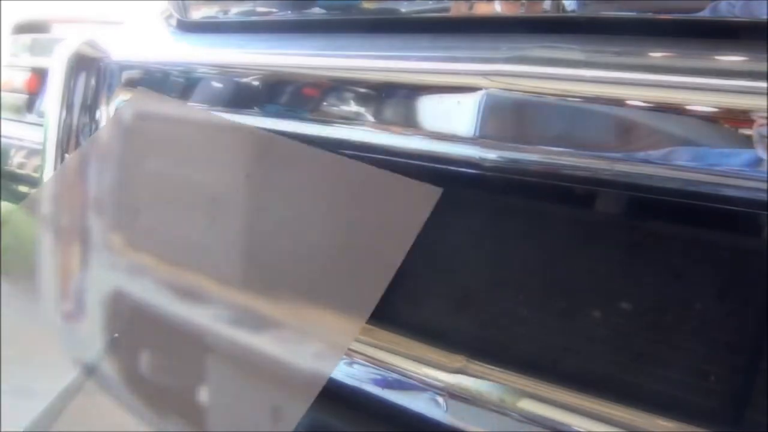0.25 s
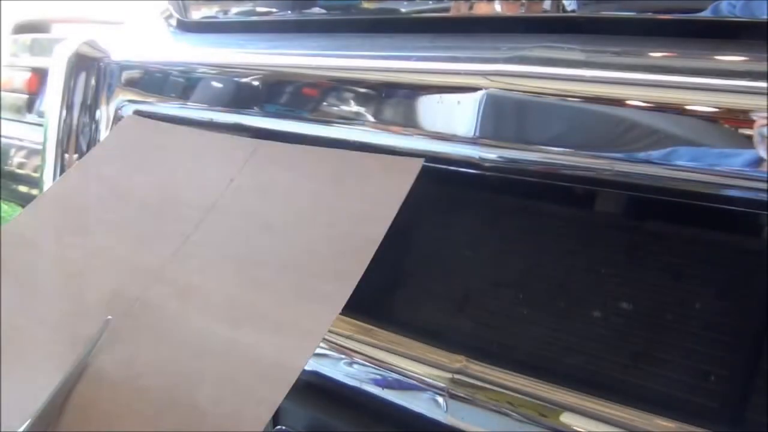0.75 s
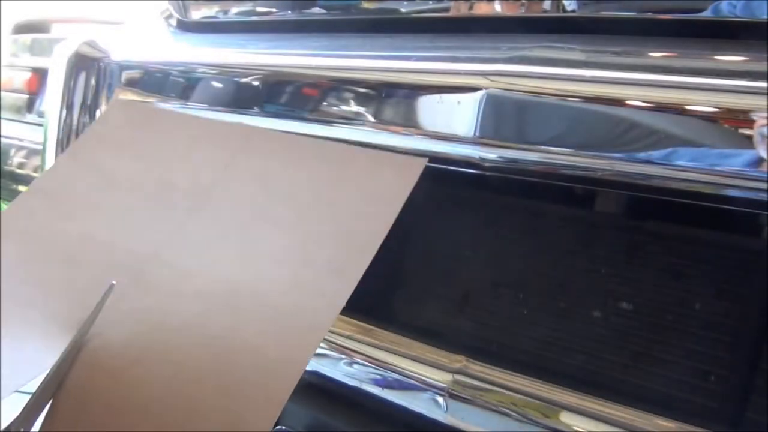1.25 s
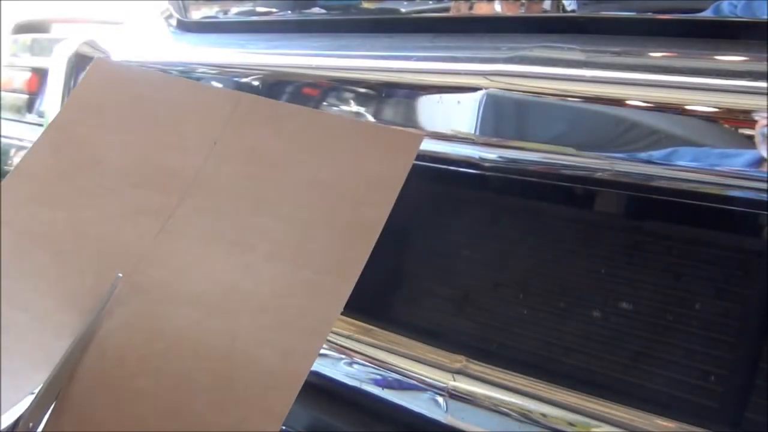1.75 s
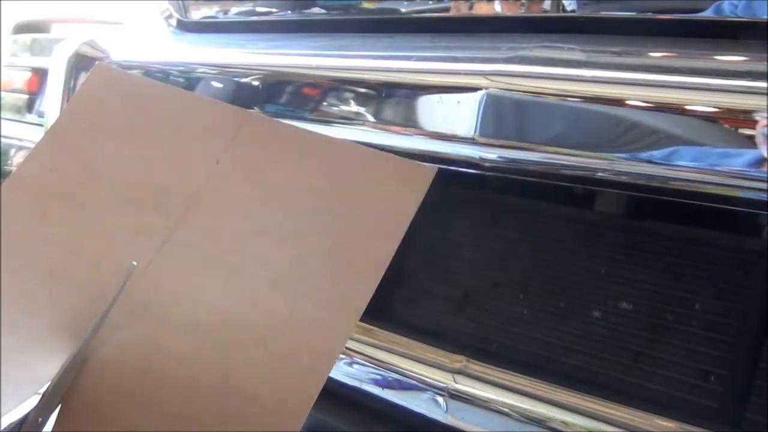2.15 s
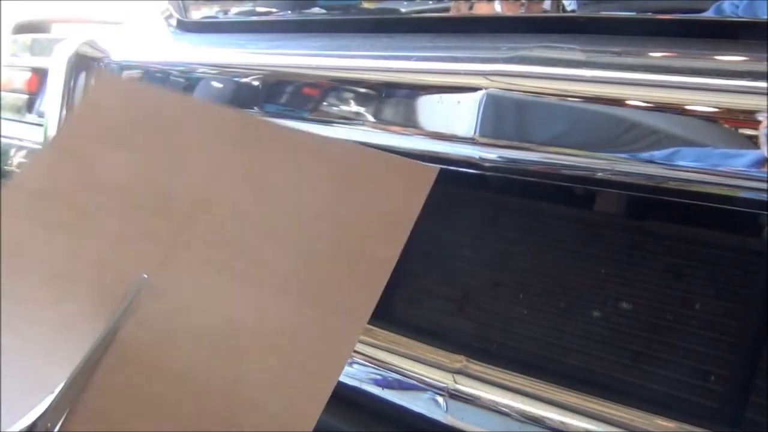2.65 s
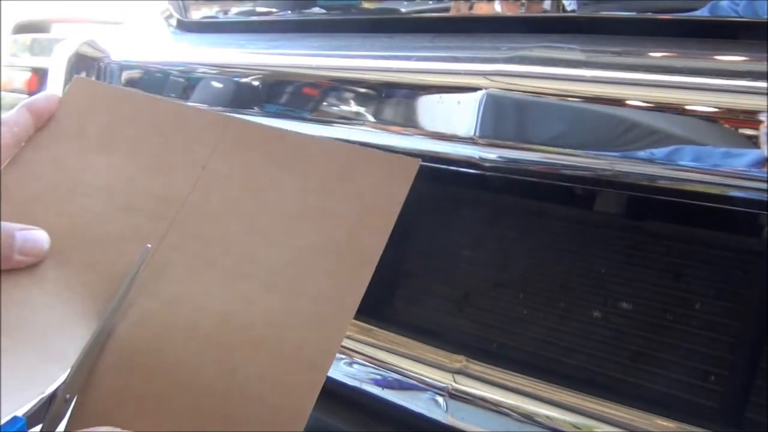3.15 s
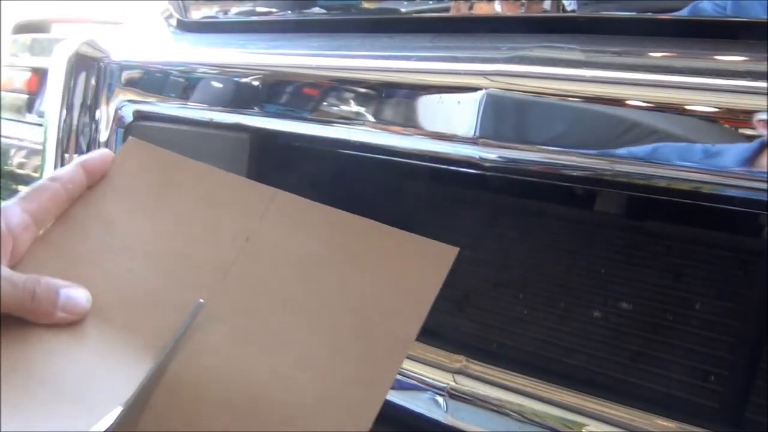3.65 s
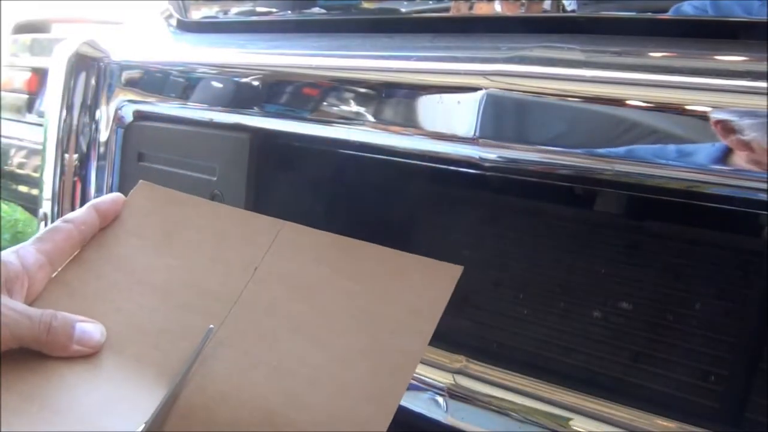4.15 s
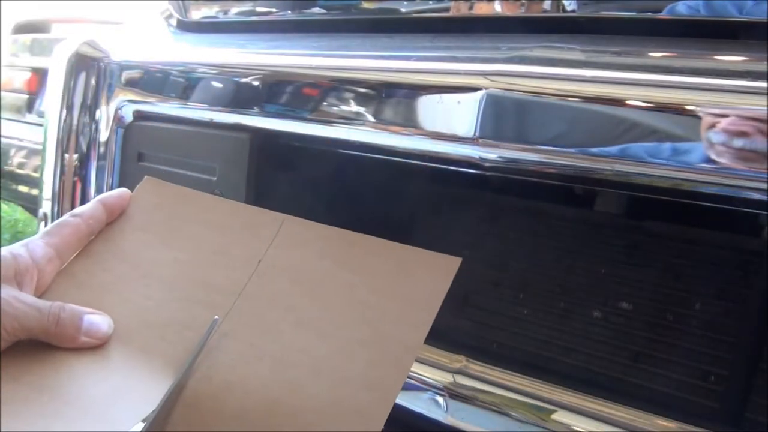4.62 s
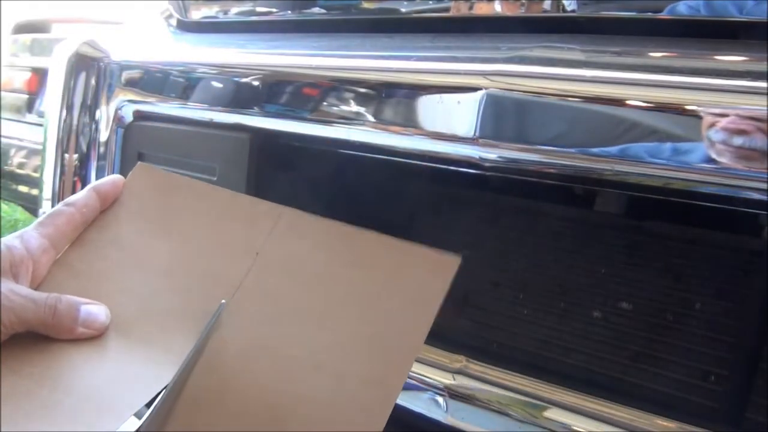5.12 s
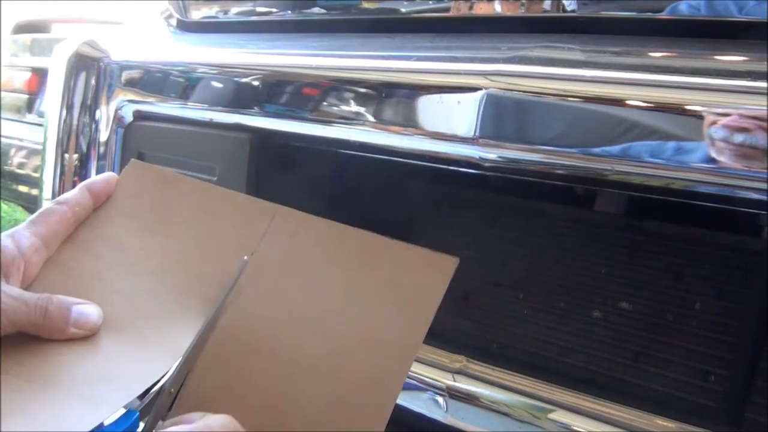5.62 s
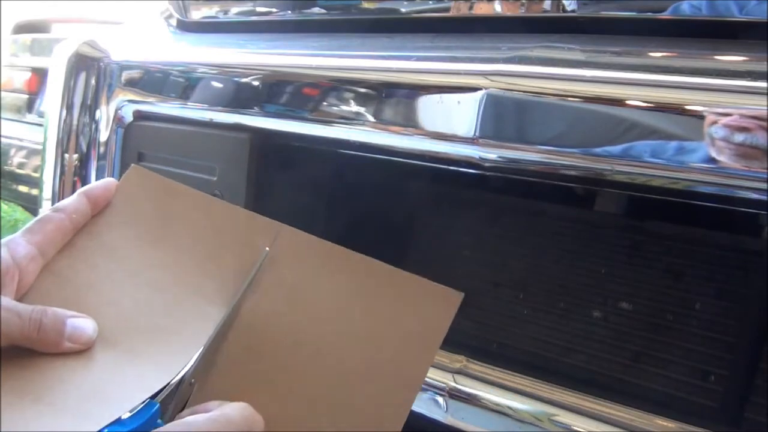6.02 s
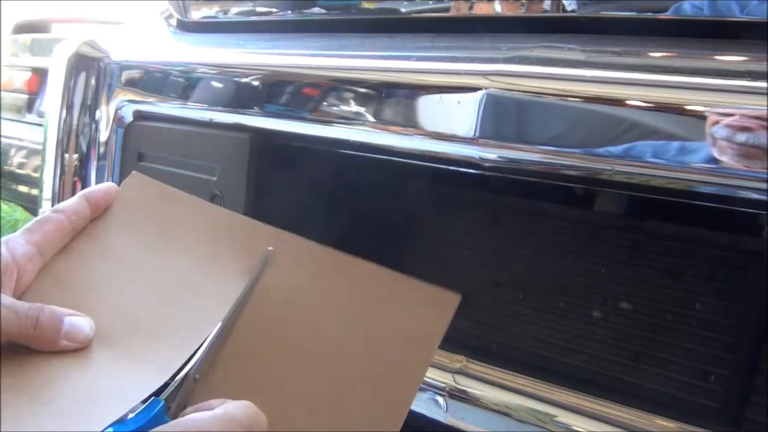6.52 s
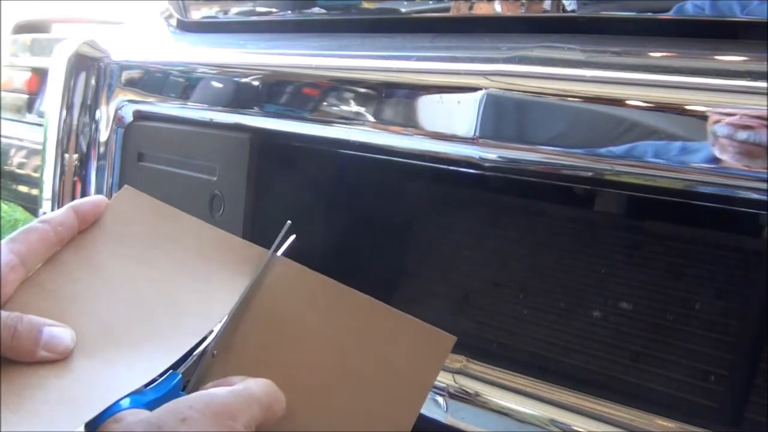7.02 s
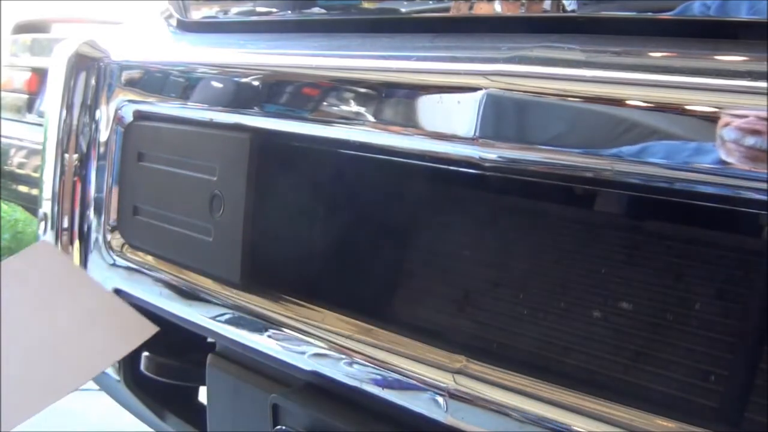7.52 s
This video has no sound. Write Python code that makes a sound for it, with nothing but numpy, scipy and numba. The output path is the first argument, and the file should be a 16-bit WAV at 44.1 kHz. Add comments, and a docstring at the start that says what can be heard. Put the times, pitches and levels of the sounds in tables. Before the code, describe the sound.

A close camcorder perspective in a garage, with short reflections and a steady low outdoor rumble and hiss. The tail of a cut and small sheet knocks open the scene. A slow, crackling scissor stroke through thin cardboard comes at 0.7 seconds, then a sharp papery pop at 1.15. More gritty cuts follow at 1.6, 2.2, 2.6 and a stronger one at 3.2, separated by soft blade rubs, dull knocks and brief sagging flexes of the sheet. Around 4.2 a thin, wavering high motor whine swells and fades during a pause. Cutting resumes at 4.9 with quicker, crisper strokes at 5.4, 5.8, 6.4, 6.7 and 7.1, blades rubbing open between them. A faint clink at 7.2 precedes a hard, bright steel strike at 7.5, bouncing and skidding for about 0.2 seconds. The background briefly drops, and a snappy card knock ends it near 7.77.

```python
"""Scissors cutting thin cardboard in a garage

Scissors cut a sheet of thin cardboard close to a camcorder, slowly at first, then in quick strokes.
Each stroke is a run of fibre fractures: grainy noise bursts colored by resonances of sheet and blades.
Between strokes the blades rub back open as softer filtered friction; the sheet knocks in short bursts
and flexes in damped, sagging sines. The zoom motor whines faintly over air noise, and at the end steel
strikes something hard and skids: decaying sines and clicks, then a bank of high modes over chatter."""
import sys
import numpy as np
from scipy import signal
from scipy.fft import rfft, irfft
from scipy.io import wavfile
from numba import njit

SR = 44100
rng = np.random.default_rng(int(sys.argv[2]) if len(sys.argv) > 2 else 0)


def output_pcm(signal):
    """Save a mono or channel-first signal as 16-bit PCM at the path in sys.argv[1].

    Samples are clipped to [-1, 1] before scaling.
    """
    pcm = np.clip(np.atleast_2d(signal).T, -1, 1) * 32767
    wavfile.write(sys.argv[1], SR, np.round(pcm).astype(np.int16))


N = 342910
TIME = np.arange(N) / SR
FREQ = np.maximum(np.fft.rfftfreq(2 * N, 1 / SR), 1)


def undb(db):
    """Logarithmic level: decibels to amplitude gain."""
    return 10 ** (np.asarray(db) / 20)


def noise():
    """White noise: equal power at all frequencies, rms near 1."""
    return rng.standard_normal(N)


def unit(x):
    """Normalization of power: scale to rms 1."""
    return x / np.sqrt(np.mean(x ** 2))


def walk(rate):
    """Random modulation: straight lines between `rate` random values per second, rms 1."""
    knots = rng.standard_normal(N // 8)
    return unit(np.interp(TIME * rate, np.arange(len(knots)), knots))


def decay(t, t60):
    """Exponential decay: a fall of 60 dB in t60 seconds."""
    return np.exp(-np.log(1000) * t / t60)


def colour(points, modes=()):
    """Modal superposition: gain over frequency, a broad spectrum with resonances standing on it."""
    hz, db = np.transpose(points)
    broad = undb(np.interp(np.log(FREQ), np.log(hz), db))
    peaks = sum(undb(d) / (1 + (2 * (FREQ - f) / width) ** 2) for f, width, d in modes)
    return broad * (1 + peaks)


def ring(x, gain):
    """Minimum phase: a causal filter of unit power, its gain folded through the cepstrum."""
    cepstrum = irfft(np.log(unit(gain) + 1e-5))
    cepstrum[1:N] *= 2
    cepstrum[N + 1:] = 0
    response = np.exp(rfft(cepstrum))
    return irfft(rfft(x, 2 * N) * response)[:N]


@njit
def resonate(x, hz, width):
    """Simple resonance: a band-pass whose centre and width may move, with gain 1 at the centre."""
    y, band, low = np.empty(len(x)), 0., 0.
    for i in range(len(x)):
        g, damping = np.tan(np.pi * hz[i] / SR), width[i] / hz[i]
        v = (band + g * (x[i] + 1e-18 - low)) / (1 + g * (g + damping))
        band, low, y[i] = 2 * v - band, low + 2 * g * v, damping * v
    return y


def radiate(drives, gain):
    """Radiation by size: fibres sound the middle, the whole sheet the lows, the blades the highs."""
    low = 1 / (1 + (FREQ / 1100) ** 8)
    high = 1 / (1 + (6500 / FREQ) ** 12)
    middle = np.maximum(1 - low - high, 0)
    shares = (middle, low, high)
    return sum(ring(x, gain * np.sqrt(share)) for x, share in zip(drives, shares))


def grains(rate, spread_db):
    """Shot noise: dense tiny clicks of uneven size and random sign, rms 1."""
    size = undb(spread_db * np.minimum(rng.exponential(size=N), 4))
    return unit((rng.random(N) < rate / SR) * size * np.sign(noise()))


def strokes(table, attack_s, release_s, linger_db, linger_s):
    """Driving force: each stroke takes hold, follows its swell about the hardest point and lets go."""
    out = np.zeros((3, N))  # fibres, sheet, blades
    for s, length, hardest, db, swell, boom, sizzle, *_ in table:
        near = slice(max(int(s * SR) - SR // 10, 0), int(s * SR) + SR // 2)
        t = TIME[near] - s
        crest = np.clip(hardest, .02, .98)
        away = np.interp(t / length, [0, crest, 1], [-1, 0, 1])
        before, after = np.maximum(-t, 0), np.maximum(t - length, 0)
        release = np.maximum(np.exp(-after / release_s), undb(linger_db) * np.exp(-after / linger_s))
        shape = undb(-swell * away ** 2) * np.exp(-before / attack_s) * release
        out[:, near] += undb([[db], [db + boom], [db + sizzle]]) * shape
    return out


def bursts(table, rise_s, fall_s, tail_db, tail_s):
    """Impulsive release: sudden drives of fibres, sheet and blades that die away quickly."""
    out, t = np.zeros((3, 2 * N)), TIME[:SR // 8]
    fall = np.exp(-t / fall_s) + undb(tail_db) * np.exp(-t / tail_s)
    shape = (1 - np.exp(-(t / rise_s) ** 2)) * fall
    for s, db, boom, sizzle in table:
        i = max(int(s * SR), 0)
        out[:, i:i + len(t)] += undb([[db], [db + boom], [db + sizzle]]) * shape / shape.max()
    return out[:, :N]


def pushes(table, delay_s):
    """Impulse excitation: one sudden shove on the sheet, of random sign, for each event."""
    out, signs = np.zeros(N), np.sign(noise())
    for (s, db, boom, _), sign in zip(table, signs):
        out[min(int((s + delay_s) * SR), N - 1)] += undb(db + boom) * sign
    return out


def glide(table, first_hz, last_hz):
    """Time-varying resonance: a pitch sliding from its first to its last value through each stroke."""
    ends = np.ravel([(s, s + length) for s, length, *_ in table])
    pitches = np.column_stack([first_hz, last_hz]).ravel()
    return np.interp(TIME, np.maximum.accumulate(ends), pitches)


# spectrum of the air: (frequency [Hz], relative level [dB])
AIR_COLOUR = [(15, -89), (25, -11), (130, -1), (291, -11), (352, -11), (403, -10), (881, -12),
              (1010, -13.5), (1120, -13), (1780, -19.5), (2520, -20.5), (3490, -21.5), (3880, -23),
              (9460, -27), (15800, -28.5)]
# background level: (time [s], level [dB])
AIR_LEVEL = [(0, -44.5), (1.13, -43), (1.22, -49), (2.2, -42), (4.2, -41), (4.7, -42), (7.1, -40),
             (7.46, -46), (7.5, -59), (7.77, -48)]


def air():
    """Diffuse field: distant outdoor rumble and hiss as filtered noise, nearly alike on both sides."""
    level = undb(np.interp(TIME, *np.transpose(AIR_LEVEL)) + 0.097 * walk(6.24))
    gain = colour(AIR_COLOUR, [(126.7, 9.5, 1.0), (254, 18, -4), (12100, 710, -30)])  # Hz, width, dB
    middle = ring(noise(), gain)
    side = undb(-9) * ring(noise(), gain * np.sqrt(np.minimum(FREQ / 5000, 1)))
    return level * (middle + side * np.array([[1], [-1]]))


ZOOM_FASTEST_S, ZOOM_HALF_S = 4.18, 0.25  # time of full speed; time from there to the reduced pitch
ZOOM_HZ, ZOOM_SAG_HZ = 12700, 2600  # mean whine at full speed, its drop after ZOOM_HALF_S
ZOOM_DB, WHIRR_DB = -53.5, 9.5  # motor level at full speed, whirr relative to it


def zoom_motor():
    """Gear-mesh tones: thin wavering whines follow the lens speed; a faint steady whistle follows."""
    away = np.minimum(np.abs(TIME - ZOOM_FASTEST_S) / ZOOM_HALF_S, 2)
    wobble = 1 + .004 * walk(120) + .008 * walk(15)
    turns = np.cumsum((ZOOM_HZ - ZOOM_SAG_HZ * away ** 1.5) * wobble) / SR
    tones = np.zeros(N)
    for ratio, db in [(.76, -4), (.83, -5), (1, 2), (1.09, 0), (1.2, -2)]:
        flutter = undb(db - 4 + 5 * walk(18) + 3 * walk(70))
        tones += flutter * np.sin(2 * np.pi * ratio * turns)
    whirr = ring(noise(), colour([(2000, -4.5), (4000, -8.5), (4900, -2), (6200, -12), (10000, -12),
                                  (12800, -2.5), (15500, -10)]))
    fade = np.interp(TIME, [4.3, 4.4, 4.6, 4.7], [0, 1, 1, 0])
    whistle = undb(-56) * np.sin(2 * np.pi * 4000 * TIME) * fade
    strength = undb(ZOOM_DB) * np.exp(-away ** 4)
    return strength * (tones + undb(WHIRR_DB) * whirr) + whistle


def garage(x, near_db, near_s, far_db, far_s):
    """Reverberation: close panels and the room answer as decaying noise; the ports differ in the treble."""
    t = TIME[:SR // 2]

    def tail(t60):
        """Exponential decay of a diffuse response, scaled to unit energy."""
        response = rng.standard_normal(len(t)) * (t > .0015) * decay(t, t60)
        return response / np.linalg.norm(response)

    def echoes():
        """Convolution: the sound through one random response of panels and room."""
        response = undb(near_db) * tail(near_s) + undb(far_db) * tail(far_s)
        return signal.fftconvolve(x, response)[:N]

    # the sounding spot keeps moving, so the paths to the two ports keep changing
    angle = 2 * walk(25)
    paths = np.cos(angle) * echoes() + np.sin(angle) * echoes()
    hz, db = np.transpose([(150, -26), (700, -11), (2500, -7.0), (6000, -2.5), (9000, -0.5), (14000, -0.5)])
    side_gain = undb(np.interp(np.log(FREQ), np.log(hz), db))
    side = irfft(rfft(paths, 2 * N) * side_gain)[:N]
    return x + echoes() + side * np.array([[1], [-1]])


# ringing steel modes: (frequency [Hz], relative level [dB])
STEEL_MODES = [(6277, -37), (6778, -39), (7144, -40), (7165, -40), (7698, -40), (7876, -40), (8263, -29),
               (8479, -32), (8856, -35), (9065, -33), (9286, -30), (9496, -28), (9819, -38), (10137, -35),
               (10417, -34), (10697, -37), (10756, -40), (11224, -36), (11579, -40), (11876, -39),
               (12145, -37), (12355, -36), (12468, -30), (12748, -31), (12850, -41), (13114, -38),
               (13340, -42), (13625, -40), (13948, -40), (15434, -43)]
# spectrum of the skid chatter: (frequency [Hz], relative level [dB])
SKID_COLOUR = [(1470, -30), (2500, -23), (2760, -19), (3030, -28), (3880, -22), (4190, -23), (6070, -14.5),
               (7710, -8), (8010, -6), (9210, -0.5), (11700, -11), (12800, -11), (15800, -18)]
SKID_START_S, SKID_LENGTH_S, SKID_DB = 7.478, 0.18, -15  # holds, easing slowly, until the steel lifts off
SKID_ATTACK_S, SKID_EASE_DB_PER_S = 0.0077, 19
SKID_RELEASE_DB_PER_S = 300  # added to the easing after lift-off


def skidding():
    """Frictional excitation: high modes and chatter sound for as long as the steel skids."""
    age = np.maximum(TIME - SKID_START_S, 0)
    fade_db = SKID_EASE_DB_PER_S * age + SKID_RELEASE_DB_PER_S * np.maximum(age - SKID_LENGTH_S, 0)
    skid = undb(SKID_DB - fade_db) * (1 - np.exp(-age / SKID_ATTACK_S))
    modes = np.zeros(N)
    for hz, db in STEEL_MODES:
        turns = hz * TIME + .13 * walk(35) / (2 * np.pi) * (2 * np.pi) + rng.random()
        modes += undb(db) * (1 + .45 * walk(35)) * np.sin(2 * np.pi * turns)
    # many weaker modes, about 200 Hz apart: Hz, width, dB
    weak = [(hz, 45, 4) for hz in np.arange(2800, 15600, 205) + rng.normal(0, 30, 63)]
    chatter = ring(grains(8300, 1.2), colour(SKID_COLOUR, weak)) * undb(0.56 * walk(600))
    contact = undb(1.5 * walk(160))
    return skid * contact * (undb(1.5) * unit(modes) + chatter)


# hard strikes of the steel: (time [s], ring level [dB], click level [dB])
STRIKES = [(7.235, -21, -46), (7.4783, -10, -12.5), (7.4983, -12, -30), (7.512, -21, -38)]


def steel():
    """Impact and modal decay: steel strikes and bounces with a click and two ringing modes, and skids."""
    out = skidding()
    click = ring(noise(), colour([(150, -33), (600, -0.5), (2200, -4.5), (5000, -3.5), (15000, -3.0)]))
    for s, ring_db, click_db in STRIKES:
        t = np.maximum(TIME - s, 0)
        for hz, db, t60 in [(2103, -8.5, 0.086), (2155, -6, 0.062)]:
            out += undb(ring_db + db) * np.sin(2 * np.pi * hz * t) * decay(t, t60)
        out += undb(click_db) * click * (t > 0) * np.exp(-t / 0.0055)
    return out


# swings of the loose sheet after a release: (time [s], initial frequency [Hz], level [dB])
FLEXES = [(.743, 408, -16.5), (0.831, 454, -18), (1.148, 501, -16), (1.681, 464, -17), (2.418, 410, -26),
          (2.716, 256, -23.5), (3.129, 164, -20), (3.342, 458.4, -15), (4.366, 329, -20.5),
          (5.83, 203, -15), (6.743, 265, -11), (7.095, 709, -16), (7.122, 231, -18.5), (7.162, 381, -18),
          (7.237, 326, -23), (7.672, 435, -29.5)]
FLEX_T60_S, FLEX_SAG = 0.084, 0.15  # decay, and the share of its pitch that a swing loses in that time


def flexing():
    """Damped bending vibration: brief swings that sag in pitch as the card relaxes."""
    out, t = np.zeros(2 * N), TIME[:SR // 6]
    envelope = (1 - np.exp(-t / 0.0022)) * decay(t, FLEX_T60_S)
    for s, hz, db in FLEXES:
        sag = 1 - FLEX_SAG * t / FLEX_T60_S
        turns = np.cumsum(hz * (sag + 0.063 * walk(109)[:len(t)])) / SR
        swing = np.sin(2 * np.pi * turns) + undb(-15.0) * np.sin(2 * np.pi * 1.6 * turns)
        i = int(s * SR)
        out[i:i + len(t)] += undb(db) * swing * envelope
    return out[:N]


# the sheet buckles or is bumped:
# (time [s], peak drive [dB], sheet boom relative [dB], sizzle relative [dB])
KNOCKS = [(0.0269, -33, -20, 9.5), (0.1516, -26, -8, -6), (0.25, -41, -29, 10), (0.3001, -34, -11, 5.5),
          (0.3365, -26.5, -16, 5), (0.3564, -29.5, -1, -6), (1.1476, -9, -14, -11),
          (1.2071, -25.5, -12, -19), (1.7516, -20.5, -12, -8), (2.6589, -14, -6, -1), (2.7184, -30, -1, -9),
          (2.9186, -17.5, -11, -21), (3.1323, -21, -5.5, -11), (3.1763, -34, 1, -24),
          (3.4015, -28, -21, 3.5), (3.5121, -26, -12, -36), (4.3656, -21.5, -3.5, -11.5),
          (5.0963, -32, 1.5, -11), (5.2225, -20, -15.5, -7.5), (5.3353, -27.5, 0.5, -12),
          (6.9678, -23, 1, -23), (7.2354, -23.5, -2, -9), (7.328, -35, -19, -4), (7.762, -22, -18, 1),
          (7.7687, -9.5, -17, -12)]
# spectrum of the knocks: (frequency [Hz], relative level [dB])
KNOCK_COLOUR = [(59, -31), (100, -2), (500, 10), (1010, 1.5), (1170, 3), (1540, -4.5), (2070, -0.5),
                (3370, -3), (3660, -10), (3990, -7.5), (6490, -22.5), (8020, -20), (12500, -24),
                (15800, -33)]
# resonances of the sheet: (frequency [Hz], width [Hz], level over the broad colour [dB])
SHEET = [(234, 59, -6), (449.4, 49, -4), (710, 18, 1.5), (1086, 75, -7), (2150, 150, -41)]


def knocking():
    """Transient excitation of plate modes: a sharp snap and a short crumpling shake the sheet."""
    drive = bursts(KNOCKS, rise_s=0.00093, fall_s=0.00075, tail_db=-17.0, tail_s=0.009)
    drive = drive * undb([[-2], [6], [-1]]) * grains(16000, 0.55)
    drive[1] += undb(22.5) * pushes(KNOCKS, delay_s=0.00091)
    return radiate(drive, colour(KNOCK_COLOUR, SHEET))


# blades opening and sliding along the slit:
# (start [s], length [s], hardest point [0-1], drive level [dB], swell [dB],
#  sheet boom relative [dB], blade sizzle relative [dB], resonance [Hz])
RUBS = [(.236, 0.084, 0.3, -46.5, 0, -9, 6, 4450), (.34, 0.063, 0.9, -41, 7, 1.5, 9.5, 4450),
        (.402, 0.025, .3, -35, 6, 4.5, -4.5, 2170), (.435, .16, 0, -45, 0, -3, -13, 2070),
        (.948, .085, 0.03, -35, 21, 4.5, -12, 2120), (1.32, 0.072, 0, -42.5, 12, 1, -13, 2220),
        (1.4, 0.073, 0.78, -38.5, 15, 2, -12, 2580), (1.91, 0.03, 0.6, -31.5, 8.5, -5.5, -9.5, 1950),
        (1.96, 0.034, 0.4, -47, 5, 6, -11, 1720), (2.09, 0.099, 0.55, -29.5, 15.5, -2.5, -10, 1547),
        (2.58, 0.029, .5, -29.5, 9.5, 1.5, -3, 1790), (2.875, .17, 0.2, -37, -3, 2.5, -6.5, 1920),
        (3.617, 0.013, 0.6, -37.5, 9, -3, -2, 2160), (3.643, 0.042, 0, -28.5, 5.5, -3.5, -5, 2200),
        (4.775, 0.09, .65, -41.5, 5, 5.5, -6, 1580), (5.155, 0.055, 0, -29.5, 5.5, -0.5, -6, 1960),
        (5.577, 0.083, 0, -29.5, 4, -0.5, -5.5, 2680), (5.945, .11, 0.5, -26.5, 12, -5.5, -8, 3420),
        (6.54, .12, 0.4, -28, 15, -7, -6.5, 3680), (6.9, 0.065, 1, -27.5, 10, -4.5, -3, 3780),
        (7.378, 0.04, 0.25, -44, 4, -16, 10.5, 2200), (7.7, 0.11, 1, -36, 15, -7, 8.5, 2230)]
# spectrum of the rubbing: (frequency [Hz], relative level [dB])
RUB_COLOUR = [(120, -30), (200, -9), (393, -1.5), (668, -2), (732, 1), (803, -10.5), (879, 1.5), (999, -3),
              (1080, -1.5), (1930, 2), (3400, 1.5), (6110, -14), (7600, -11.5), (11600, -12),
              (15800, -22.5)]


def rubbing():
    """Sliding friction: steel on the cut edges, finer and softer, with a note set by where the blades touch."""
    pressure = strokes(RUBS, attack_s=0.0032, release_s=0.0083, linger_db=-9.5, linger_s=0.034)
    drive = pressure * undb([[-2], [-2], [-1]]) * undb(2.3 * walk(140))
    sound = radiate(drive * grains(14000, 0.88), colour(RUB_COLOUR, [(742, 23, 2)]))
    *_, note = np.transpose(RUBS)
    hz = glide(RUBS, note, note)
    return sound + undb(14) * resonate(drive[0] * noise(), hz, hz / 8)


# closing strokes of the blades through the cardboard:
# (start [s], length [s], hardest point [0-1], drive level [dB], swell [dB],
#  sheet boom relative [dB], blade sizzle relative [dB],
#  flap at the start [Hz], flap at the end [Hz], mean crack resonance [Hz])
CUTS = [(0, 0.071, 0, -24.5, 5, -11, -2, 840, 650, 1420),
        (.655, .2, 0, -26, 1.5, 1, -3.5, 776, 352.8, 2810),
        (1.63, 0.11, 0.37, -21, 15.5, -2.5, -8, 548, 500, 2600),
        (2.229, 0.218, 0.25, -18.5, 12.5, -3, -8.5, 820, 400, 1365),
        (2.635, 0.056, 0.2, -24, 6, 0.5, -6, 700, 210, 3440),
        (3.226, 0.16, 0.53, -15.5, 10.5, -4, -5, 446, 480, 1720),
        (4.938, 0.11, 0.43, -18, 10, 5, 1, 570, 267.2, 2110),
        (5.391, 0.085, 0, -15, 13, 1, -0.5, 525, 183, 1800),
        (5.787, .056, 0, -10.5, 7.5, -2.5, -3, 716, 156, 3620),
        (6.359, 0.0813, 0.96, -17, 9, 0.5, -1, 770, 378, 2660),
        (6.72, 0.068, 0.04, -15, 12, -2.5, 0, 303, 170, 2586),
        (7.074, 0.1, 0.34, -19, 13.5, 4, 7.5, 800, 376, 2807)]
# the thickest bundles of fibres giving way: (time [s], crack drive [dB], sheet boom relative [dB])
SLIPS = [(.001, -26, -7), (0.059, -31, -3), (0.0866, -27.5, -4), (0.658, -30.5, 14), (0.685, -19.5, -1),
         (0.7014, -25, 8), (0.7447, -20, -2), (0.792, -20.5, -11), (0.8264, -19.5, 0), (1.6558, -28.5, 3),
         (1.6787, -19.5, -5), (1.719, -24, -17), (2.233, -15, -5.5), (2.2594, -21, -3), (2.3207, -15.5, -2),
         (2.3845, -20.5, 1.5), (2.432, -28, -5), (3.2302, -23.5, 4), (3.2698, -36, -9), (3.293, -19, -7),
         (3.344, -32, 8), (4.945, -28, 8), (4.9763, -18.5, 6), (4.9938, -17.5, 6), (5.0387, -21.5, 2.5),
         (5.3963, -13, -11), (5.433, -16.5, -3), (5.458, -29, -2), (5.4712, -22, 5.5), (5.7873, -12, -0.5),
         (6.36, -19, 1), (6.3821, -11, -5), (6.405, -10, -4), (6.417, -18, -8), (6.7528, -13.5, 1),
         (7.0762, -24, 10), (7.126, -16.5, -3), (7.1372, -20.5, -2)]
SNAP_GAP_S, SNAP_JITTER = .018, 0.2004  # mean spacing of lesser snaps, scatter as a share of it
SNAP_DB, SNAP_SCATTER_DB = -6, 5  # their strength relative to the stroke
SNAP_COLOUR_DB = 2.5  # scatter of boom and sizzle from snap to snap


def snaps(effort):
    """Brittle fracture: rows (s, dB, boom dB, sizzle dB) of thick bundles and lesser, uneven ones between."""
    rows = []
    for start, length, _, _, _, boom, sizzle, *_ in CUTS:
        chance = rng.standard_normal((64, 4))
        first, last = start - SNAP_GAP_S, start + length + SNAP_GAP_S
        thick = [(s, db, low, sizzle) for s, db, low in SLIPS if first < s < last]
        marks = [start] + [row[0] for row in thick] + [start + length]
        steps = []
        for a, b in zip(marks, marks[1:]):
            count = max(round((b - a) / SNAP_GAP_S), 1)
            steps.extend(np.linspace(a, b, count + 1)[1:-1])
        for s, (late, size, dull, bright) in zip(steps, chance):
            stroke_db = 20 * np.log10(np.interp(s, TIME, effort) + 1e-9)
            rows.append((s + SNAP_JITTER * SNAP_GAP_S * late,
                         stroke_db + SNAP_DB + SNAP_SCATTER_DB * size,
                         boom + SNAP_COLOUR_DB * dull,
                         sizzle + SNAP_COLOUR_DB * bright))
        rows += thick
    return rows


def sticking(slips, lead_s, width_s, depth_db):
    """Stick-slip: the blades stall for a moment while the next bundle of fibres takes the strain."""
    starts = np.sort([row[0] for row in slips])
    upcoming = np.minimum(np.searchsorted(starts, TIME), len(starts) - 1)
    wait = starts[upcoming] - TIME
    return undb(depth_db * np.exp(-((wait - lead_s) / width_s) ** 2))


# spectrum of the quick strokes: (frequency [Hz], relative level [dB])
CUT_COLOUR = [(65, -35), (110, -12.5), (218, -5.5), (425, 0), (729, -2.5), (826, -6.5), (936, -2.5),
              (1450, -1), (2760, -1.5), (4640, -8), (5590, -9.5), (6600, -19), (10200, -19), (12100, -14.5),
              (15800, -31.5)]
# spectrum of the slow strokes: (frequency [Hz], relative level [dB])
SLOW_COLOUR = [(82, -76), (140, -15), (341, -5), (376, -15), (450, 2), (629, -6), (723, -3), (992, -6),
               (1530, -10), (1690, -5), (2770, -8.5), (4370, -19.5), (10400, -5.5), (12200, -7),
               (15800, -19)]
# blade resonances: (frequency [Hz], width [Hz], level over the broad colour [dB])
BLADES = [(3400, 400, -10), (5650, 300, -9), (11850, 500, -3), (12550, 400, 1)]
LONG_SLIT_S = 4  # the slit counts as long, and the strokes as quick, after this time


def cutting():
    """Fracture driving resonators: fibres snap over a steadier tearing, heard through flap and crack.

    The flap note glides, mostly down as the freed flap lengthens; the crack note wanders."""
    long_slit = TIME > LONG_SLIT_S
    effort = strokes(CUTS, attack_s=0.0041, release_s=0.0072, linger_db=-2, linger_s=0.018)
    bundles = snaps(effort[0])
    # slow strokes stall more deeply before each snap than quick ones
    stall = sticking(bundles, lead_s=.002, width_s=.007, depth_db=np.where(long_slit, -4, -9))
    tearing = effort * undb([[-5], [-4], [-5]]) * undb(2.57 * walk(170)) * stall
    slips = bursts(bundles, rise_s=0.00095, fall_s=0.0056, tail_db=-35.5, tail_s=0.005)
    slips = slips * undb([[-1.5], [-7], [-1]])
    grit = np.array([grains(9000, 0.99), grains(12000, 0.36), grains(10000, 1.2)])
    drive = np.hypot(tearing, slips) * grit
    drive[1] += undb(19.5) * pushes(bundles, delay_s=0.00198)
    slow = radiate(drive * ~long_slit, colour(SLOW_COLOUR, SHEET + BLADES))
    quick = radiate(drive * long_slit, colour(CUT_COLOUR, SHEET + BLADES))
    sound = slow + quick
    *_, flap_first, flap_last, crack_note = np.transpose(CUTS)
    flap_hz = glide(CUTS, flap_first, flap_last)
    crack_hz = glide(CUTS, crack_note, crack_note) * 2 ** (.11 * walk(50))
    flap = undb(0.5) * resonate(sound, flap_hz, flap_hz / 8)
    crack = undb(5.5) * resonate(sound, crack_hz, crack_hz / 11)
    return undb(-2.5) * (sound + flap + crack)


def scene():
    """Superposition: scissors and sheet slightly to the left in the garage, with motor and air added."""
    work = cutting() + rubbing() + knocking() + flexing() + steel()
    heard = garage(work, near_db=-10, near_s=0.078, far_db=-11.0, far_s=0.093)
    heard = heard * undb([[-.2], [-.8]])  # left, right
    return heard + zoom_motor() + air()


def record(dry):
    """Saturation and band limiting: the camcorder rounds the highest peaks and cuts the top."""
    rounded = dry / (1 + np.abs(dry / 1.1) ** 4) ** (1 / 4)
    low_pass = signal.ellip(10, .2, 70, 15800, fs=SR, output="sos")  # ripple dB, stopband dB, edge Hz
    return signal.sosfilt(low_pass, rounded)


dry = scene()
out = record(dry)
output_pcm(out)
```